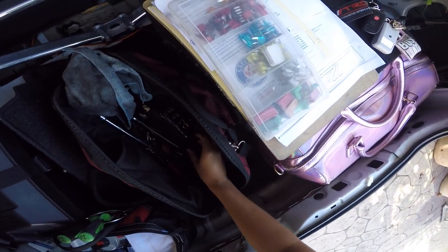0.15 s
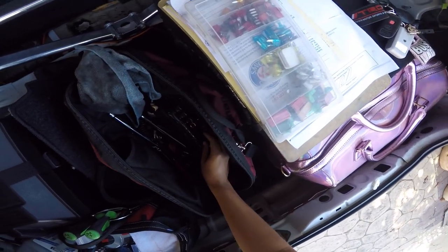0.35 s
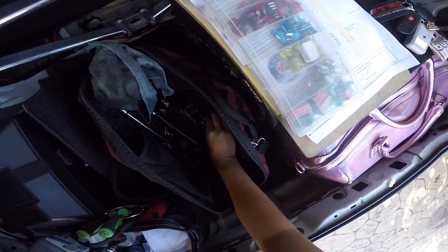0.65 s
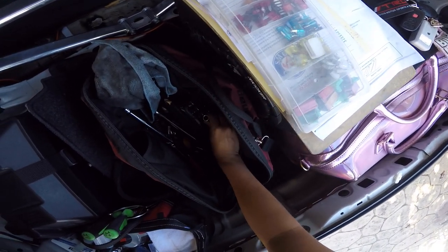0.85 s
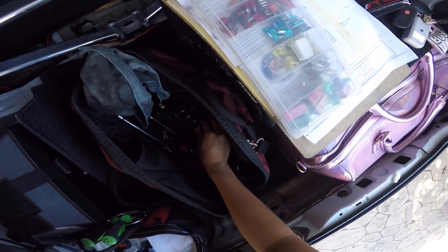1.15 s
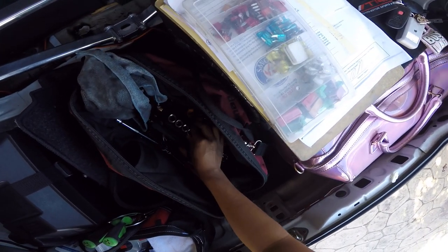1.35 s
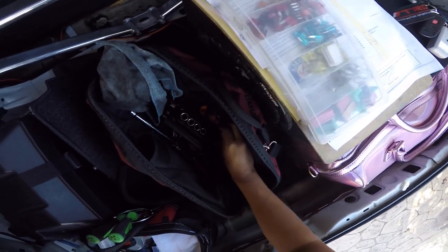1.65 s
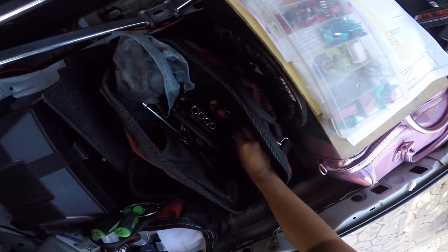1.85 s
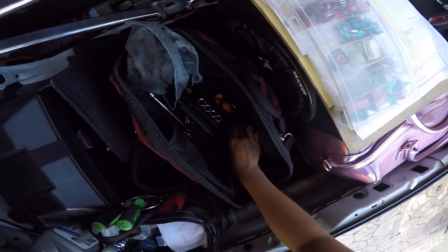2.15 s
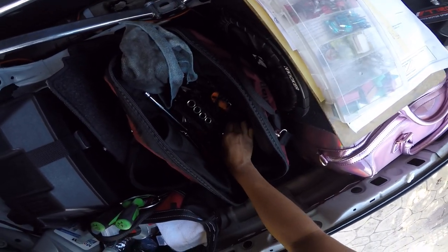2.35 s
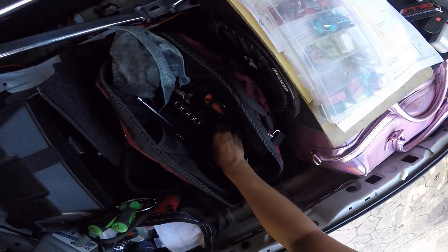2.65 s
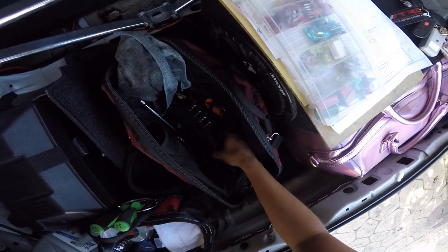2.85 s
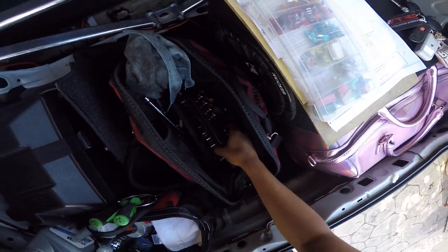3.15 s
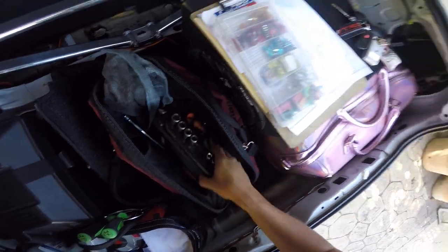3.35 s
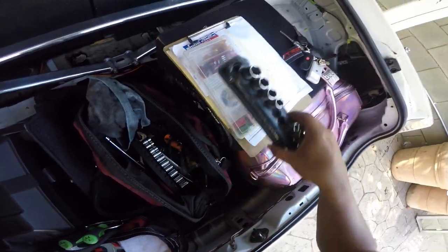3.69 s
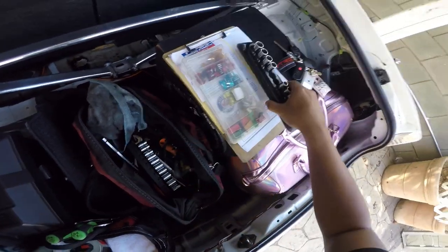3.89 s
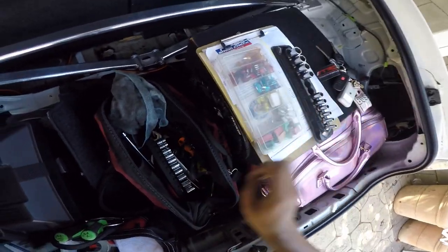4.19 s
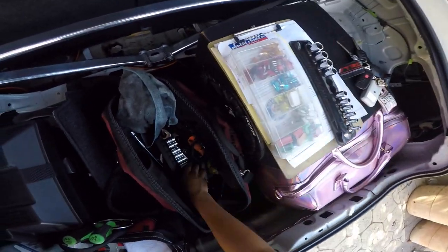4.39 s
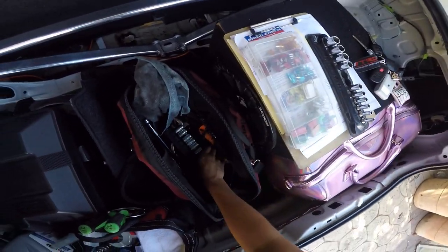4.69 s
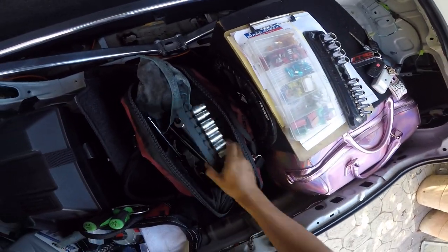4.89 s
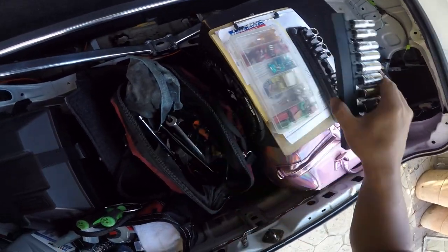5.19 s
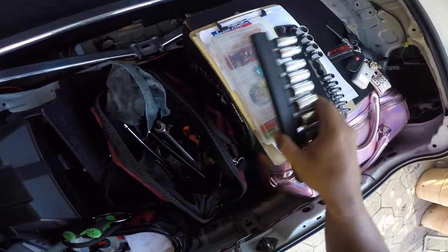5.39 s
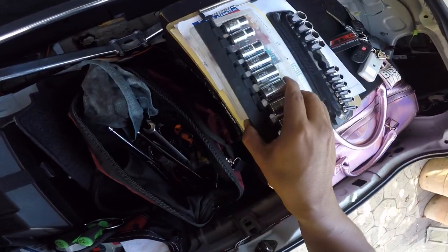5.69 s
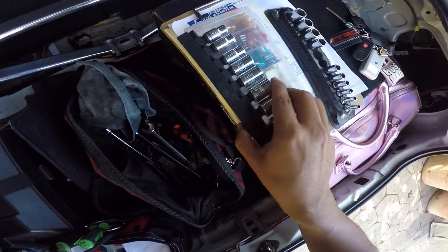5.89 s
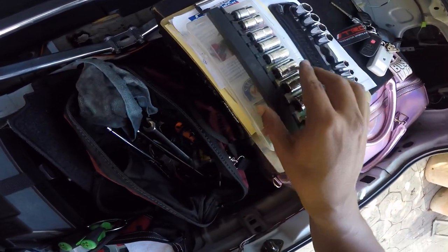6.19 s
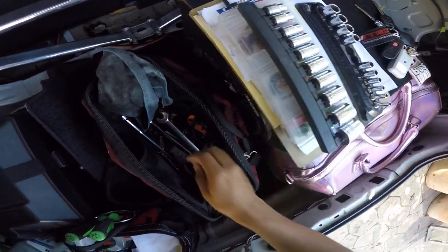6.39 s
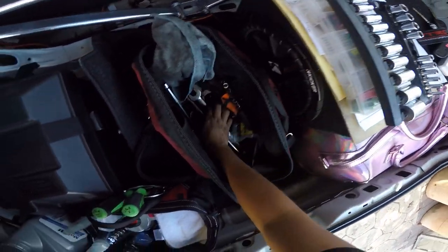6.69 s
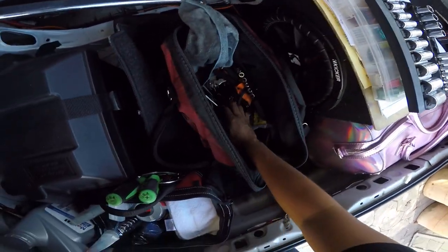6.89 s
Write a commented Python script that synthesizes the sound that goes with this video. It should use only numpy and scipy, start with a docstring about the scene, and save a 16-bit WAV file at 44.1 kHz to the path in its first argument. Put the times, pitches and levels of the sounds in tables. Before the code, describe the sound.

Plastic rails of metal sockets clack, knock and clink as a hand rummages in a cloth tool bag, over low motor rumble.

```python
"""Plastic rails of sockets clack, scrape and knock as a hand rummages in a fabric tool bag in an open car boot.
Damped bodies (rails, bag, box lid) are filtered rough contacts; sockets and wrenches are decaying sine modes.
The boot floor booms in a few low sines; cloth, motor, road and passing vehicle are shaped stereo noise.
Two microphone ports hear it, the right honking in the low mids; loud blows duck the gain."""
import sys
import numpy as np
from scipy import signal
from scipy.fft import rfft, irfft, next_fast_len
from scipy.io import wavfile
from scipy.ndimage import uniform_filter1d, minimum_filter1d

SR = 44100
rng = np.random.default_rng(int(sys.argv[2]) if len(sys.argv) > 2 else 0)


def transcribe(signal):
    """Save signal, clipped to [-1, 1], as a 16-bit WAV file at the path in sys.argv[1]."""
    frames = np.atleast_2d(signal).T
    limited = np.clip(frames, -1, 1)
    pcm = np.round(limited * 32767).astype(np.int16)
    wavfile.write(sys.argv[1], SR, pcm)


N = 310464
SECONDS = np.arange(N) / SR
HIT_S = np.arange(SR // 2) / SR   # time axis of one hit
FFT_SIZE = next_fast_len(N + SR)
BIN_HZ = np.maximum(np.fft.rfftfreq(FFT_SIZE, 1 / SR), 1)

# plastic rails snapping against tool handles: (time [s], level [dB], centre [Hz])
RAIL_CLACKS = [(0.5719, -18, 2100), (0.776, -19, 1980), (1.1318, -21, 1700), (1.1415, -16, 2030),
               (1.166, -18, 3300), (1.188, -22.5, 2000), (1.4655, -26.5, 3400), (1.521, -30, 2400),
               (2.1233, -18.5, 1670), (2.142, -15.5, 1811), (2.184, -24.5, 1950), (2.3468, -22.5, 4900),
               (2.3695, -15.5, 1900), (2.411, -15, 5100), (2.447, -20, 4982), (2.484, -11.5, 2600),
               (2.911, -22.5, 5000), (2.994, -18, 2007), (3.921, -9, 1960), (4.018, -17.5, 6820),
               (4.355, -25, 4500), (5.7855, -13, 2500), (5.9804, -9, 2888)]
# rails struck where they are hollow, ringing a moment: (time [s], level [dB], centre [Hz])
HOLLOW_RAIL_CLACKS = [(2.976, -16.5, 1850), (3.0522, -4, 2990), (3.968, -11, 1608), (6.731, -17, 1616)]
# rail dragged over the bag or box lid: (start [s], end [s], level of each slip [dB], centre [Hz])
RAIL_SCRAPES = [(0.778, 0.82, -32, 2680), (1.293, 1.33, -30, 2000), (2.513, 2.547, -35, 4200),
                (3.968, 4.015, -29, 1703), (6.066, 6.124, -24, 2670), (6.135, 6.16, -26.5, 3100)]
# rails bumping inside the bag: (time [s], level [dB], centre [Hz])
BAG_KNOCKS = [(0.158, -22.5, 643), (0.614, -10.5, 292.3), (0.775, -18, 466), (1.112, -11, 585),
              (1.167, -5.5, 588.5), (1.188, -13, 214.3), (1.279, -11.5, 328), (1.328, -10.5, 585),
              (1.364, -8, 484), (1.596, -13, 321), (2.295, -10, 315), (2.367, -15, 570), (2.487, -12, 533),
              (2.527, -12, 480), (2.768, -15, 580), (2.933, -7.5, 506.2), (2.976, -3.5, 409),
              (3.053, -6, 278.4), (3.176, -13.5, 566), (6.677, -4.5, 543.7), (6.753, -4, 536),
              (6.797, -11.5, 663), (6.83, -7.5, 186.7)]
# rails set down on the box lid, short and firm: (time [s], level [dB], centre [Hz])
BOX_LID_KNOCKS = [(4.023, 0.5, 486), (5.458, -5, 379), (5.786, 2, 432), (6.081, -6.5, 669.4),
                  (6.097, 2, 554.8), (6.135, -3.5, 777)]
# sockets struck on their rail: (time [s], level [dB], socket, t60 [s], relative clatter of neighbours [dB])
SOCKET_CLINKS = [(1.332, -11, "deep", 0.057, 0.5), (1.3608, -11.5, "medium", 0.076, 1),
                 (1.3701, -18.5, "large", 0.076, -2), (1.413, -23, "medium", 0.032, 2.5),
                 (2.932, -10, "deep", 0.0395, 8), (3.052, -7.5, "deep", 0.1225, 8),
                 (4.5696, -12, "medium", 0.0497, -6.5), (4.692, -15.5, "small", .05, -4.5),
                 (4.7424, -13, "large", 0.0813, 1.5), (6.6666, -18, "deep", 0.055, 6),
                 (6.668, -16, "large", 0.043, -3.5), (6.738, -19.5, "deep", 0.0307, 7),
                 (6.955, -10, "medium", 0.107, -10.5)]
# jostled sockets bouncing on other tools: (start [s], end [s], level of each bounce [dB])
SOCKET_CHATTERS = [(1.363, 1.384, -21.5), (3.024, 3.078, -15), (6.752, 6.858, -28), (6.975, 7.025, -30.5)]
# modes of each socket size: (frequency [Hz], relative level [dB])
SOCKET_MODES = {"small": [(4465, 3), (5405, -16)], "medium": [(3130, 1.5), (4097, -2), (4560, -1),
                (5550, -11), (6025, 1), (6510, -9.5), (10150, -17)], "large": [(1890, -5.5), (3125, -1.5),
                (3378, -14), (4430, -6.5), (5365, -9.5), (6015, -3), (12389, -22)], "deep": [(1930, -8),
                (4650, -6), (5540, 3.5), (7175, 0), (7560, -10), (14150, -11)]}
# loose wrenches struck: (time [s], level [dB], wrench, t60 [s])
WRENCH_CLANGS = [(2.936, -25, "short", 0.27), (3.021, -6, "flat", 0.086), (3.052, -14.5, "short", 0.188),
                 (4.387, -25, "flat", 0.063), (4.645, -38, "flat", 0.22), (6.668, -18, "short", 0.101),
                 (6.75, -11.5, "short", 0.346), (6.765, -13, "long", 0.445), (6.785, -18, "flat", 0.59),
                 (6.795, -15, "long", 0.216), (6.83, -13, "long", 0.207), (6.832, -17, "flat", 0.496),
                 (6.972, -7.5, "flat", 0.321)]
# modes of each wrench: (frequency [Hz], relative level [dB])
WRENCH_MODES = {"long": [(1491, -10), (3090, -8), (3803, 4), (4447, -8.5), (5377, -13), (9310, -1.5),
                (11610, -5.5)], "short": [(3187, -6.5), (5210, -2.5), (7127, -2.5), (7715, -0.5),
                (10640, -6.5), (12380, -7), (13940, -4.5), (15240, -9.5)], "flat": [(2560, -21), (4099, -9),
                (4655, -11), (5377, 3), (6514, -8.5), (7127, 2), (7474, -8.5), (9312, -5.5), (11628, -12.5),
                (14062, -10.5)]}
# spells of rummaging: (start [s], end [s], cloth hiss [dB], loose rattle [dB])
RUMMAGE_SPELLS = [(0, 0.593, -53.5, -45), (0.74, 0.849, -47.5, -27.5), (1.052, 1.73, -55, -36.5),
                  (1.912, 2.575, -53, -35), (2.669, 3.104, -54, -36), (3.565, 4.033, -51.5, -40.5),
                  (4.34, 4.431, -46, -27), (4.549, 4.853, -47, -31), (5.459, 5.711, -54, -33.5),
                  (5.925, 6.145, -53, -32), (6.524, 6.698, -52, -36.5), (6.689, 7.034, -43.5, -34.5)]
# weight landing on the boot floor: (time [s], level [dB])
FLOOR_THUMPS = [(1.168, -12), (1.361, -7), (2.942, -9.5), (3.053, -4), (4.029, -9), (4.743, -4),
                (6.096, -1.5), (6.674, -7.5), (6.865, -7.5)]
# floor panel modes: (frequency [Hz], relative level [dB])
FLOOR_MODES = [(88, -0.5), (112, 13.3), (135, 5.56)]
# motor rumble: (time [s], level [dB])
MOTOR_LEVEL = [(0.0, -24.5), (2.96, -19.5), (3.12, -23.5), (3.67, -23), (3.86, -17.5), (5.59, -18),
               (6.23, -17.5), (7.04, -18.5)]
# road noise: (time [s], level [dB])
ROAD_LEVEL = [(0.0, -36.5), (2.16, -30.5), (3.31, -31), (4.57, -22), (5.06, -26), (5.69, -23), (5.94, -20),
              (6.2, -24), (6.47, -27.5), (6.65, -27), (7.04, -32)]
# spectra of damped bodies and noises: (frequency [Hz], relative level [dB])
PLASTIC_SPECTRUM = [(300, 14.5), (1100, 11), (1900, 8), (2500, 0.5), (3400, 5.5), (5000, 0.5), (7300, -4),
                    (8700, -21.5), (13000, -22.5), (15500, -33.5)]
BAG_SPECTRUM = [(80, 1), (230, 4.5), (370, 4.5), (470, -5), (600, 2), (780, -2), (1050, -12.5),
                (1800, -20.5), (4000, -32.5), (12000, -99)]
FABRIC_SPECTRUM = [(500, -20.5), (1800, 11.5), (3500, 7), (7300, 3), (8800, -1.5), (10500, -3.5),
                   (13000, -13), (15500, -27.5)]
RUMBLE_SPECTRUM = [(15, -5.5), (26, 6), (33, -2.5), (45, 9), (62, 1), (72, 6), (85, -0.5), (98, -1),
                   (109, 10.5), (122, -2), (155, -12.5), (300, -27.5), (900, -75.5), (5000, -110)]
ROAD_SPECTRUM = [(60, -13), (150, 8), (205, 4), (290, 2), (400, 1), (650, 0), (820, -6), (1050, -14),
                 (1750, -22), (2500, -38), (5000, -49), (15000, -69)]
EXHAUST_SPECTRUM = [(35, -21), (62, 12), (100, -9), (140, -1), (165, 6.5), (210, 10.5), (270, -8),
                    (500, -12), (5000, -110)]
# microphone ports: (frequency [Hz], left minus right [dB])
PORT_DIFFERENCE = [(290, -0.5), (470, -2.5), (760, -12.5), (1200, -3), (1950, 3), (3000, -0.5)]
# likeness of the two channels for diffuse sound: (frequency [Hz], correlation)
PORT_LIKENESS = [(150, 1), (400, 1), (620, 1), (800, 0), (1200, 0), (2800, 0.515), (6500, 0.051),
                 (15000, 0)]

# light touches: the rail's resonance varies with the spot
TOUCH_HZ, TOUCH_SCATTER_OCT = 2160, 0.3
# a harder bump is higher in pitch and clacks more: clack relative to the knock at HARD_HZ, and its slope
HARD_HZ, KNOCK_CLACK_DB, HARDNESS_DB_PER_OCT = 579.5, -15, 12.5
RATTLES_PER_S, SLIPS_PER_S, CONTACT_SPREAD_DB = 42, 330, 3.0
SLIP_KNOCK_DB = 7.5   # the surface below relative to each slip
CHATTERS_PER_S, CHATTER_T60_S = 140, 0.059
RING_LINEWIDTH_HZ = 5   # wander of a mode while its tool touches others
HAND_RAMP_S, CLOTH_REST_DB, CLOTH_GRAIN_DB = 0.019, -58, 2.3
CEILING_DB, RECOVERY_DB_PER_S, GAIN_WINDOW_S = -0.5, 8, 0.0046
CUTOFF_HZ = 15600


def rails():
    """Plastic clacks, alone, with each bump and as loose rattle; contents shift in grains around firm ones."""
    bumps = []
    for s, db, hz in [*BAG_KNOCKS, *BOX_LID_KNOCKS]:
        hardness_db = HARDNESS_DB_PER_OCT * np.log2(hz / HARD_HZ)
        bumps.append((s, db + KNOCK_CLACK_DB + hardness_db))
    touches = [(s, db, TOUCH_HZ * 2 ** (TOUCH_SCATTER_OCT * rng.normal()))
               for s, db in [*bumps, *rattles()]]
    clacks = dull_hits([*RAIL_CLACKS, *touches], PLASTIC_SPECTRUM, q=5.0, blow_db=9, broad_db=-3,
                       crack_t60_s=.015, tail_db=-17, tail_t60_s=.07, spread=.3)
    clacks += dull_hits(HOLLOW_RAIL_CLACKS, PLASTIC_SPECTRUM, q=5.0, blow_db=4, broad_db=-13,
                        crack_t60_s=.045, tail_db=-20, tail_t60_s=.09, spread=.3)
    firm = [*RAIL_CLACKS, *HOLLOW_RAIL_CLACKS, *bumps]
    return from_db(1.5) * clacks + shifting_contents(firm)


def shifting_contents(firm):
    """Random grains of plastic noise, swelling and fading around each firm contact."""
    # 8.8 ms each side of a contact
    activity = np.sqrt(sum(from_db(db) * np.exp(-np.abs(SECONDS - s) / 0.0088) for s, db, *_ in firm))
    strength = from_db(2.0 * np.minimum(rng.exponential(1, N), 3))
    grains = (rng.random(N) < 260 / SR) * strength   # 260 per second
    envelope = signal.lfilter([1], [1, -np.exp(-1 / (0.00707 * SR))], grains)   # each dies in 7 ms
    envelope *= from_db(-30) / envelope.std()
    return activity * envelope * diffuse(PLASTIC_SPECTRUM) / 2


def rattles():
    """Small contacts while the hand moves: (time [s], level [dB])."""
    spells = [(start, end, db) for start, end, _, db in RUMMAGE_SPELLS]
    return uneven(spells, RATTLES_PER_S, count=40)


def scrapes():
    """A dragged rail sticks and slips; each slip ticks in the plastic and knocks on the surface below."""
    slips = uneven(RAIL_SCRAPES, SLIPS_PER_S)
    below = [(s, db + SLIP_KNOCK_DB, HARD_HZ * 2 ** (rng.normal() / 2)) for s, db, _ in slips]
    touch = dict(q=5, blow_db=4, broad_db=-9, crack_t60_s=.018, tail_db=-15, tail_t60_s=.06, spread=.15)
    return dull_hits(slips, PLASTIC_SPECTRUM, **touch) + dull_hits(below, BAG_SPECTRUM, **touch)


def knocks():
    """The bag answers a rail with a loose thud, the box lid with a compact one."""
    bag = dull_hits(BAG_KNOCKS, BAG_SPECTRUM, q=4.8, blow_db=18.5, broad_db=-13.0,
                    crack_t60_s=0.0567, tail_db=-4.5, tail_t60_s=0.13, spread=0.034)
    lid = dull_hits(BOX_LID_KNOCKS, BAG_SPECTRUM, q=4.0, blow_db=19, broad_db=-11.0,
                    crack_t60_s=0.025, tail_db=-17, tail_t60_s=0.1, spread=0.034)
    return from_db(-0.04) * bag + lid


def sockets():
    """The rail's grip damps the sockets quickly; jostled, one after another chatters on the other tools."""
    out = np.zeros((2, N))
    bounces = [(s, db, rng.choice(list(SOCKET_MODES)), CHATTER_T60_S, 0)
               for s, db in uneven(SOCKET_CHATTERS, CHATTERS_PER_S)]
    for s, db, size, t60_s, clatter_db in [*SOCKET_CLINKS, *bounces]:
        clink = steel(SOCKET_MODES[size], t60_s, detune=0.0155, spread=0.387, others_db=clatter_db - 5.5,
                      others_t60_s=t60_s * 1.28, crack_db=clatter_db + 6.5)
        add(out, s, db + 0.5, clink)
    return out


def wrenches():
    """Loose wrenches ring on unless the bag or the hand damps them."""
    out = np.zeros((2, N))
    for s, db, kind, t60_s in WRENCH_CLANGS:
        clang = steel(WRENCH_MODES[kind], t60_s, detune=0.0045, spread=0.675, others_db=-6,
                      others_t60_s=t60_s * 0.44, crack_db=-6.0)
        add(out, s, db - 0.5, clang)
    return out


def boot_floor():
    """The floor panel booms briefly in its low modes under a weight."""
    out = np.zeros((2, N))
    envelope = fade(0.15) * (1 - fade(0.0321))
    for s, db in FLOOR_THUMPS:
        boom = sum(from_db(mode_db + 2 * rng.normal()) * np.sin(2 * np.pi * hz * HIT_S)
                   for hz, mode_db in FLOOR_MODES) * envelope
        add(out, s, db + 2.0, np.array([boom, boom]))
    return out


def fabric():
    """The cloth hisses and catches unevenly under the hand, and settles quietly between spells."""
    brush = from_db(CLOTH_REST_DB)
    for start, end, hiss_db, _ in RUMMAGE_SPELLS:
        moving = np.clip(.5 + np.minimum(SECONDS - start, end - SECONDS) / HAND_RAMP_S, 0, 1)
        brush = np.maximum(brush, from_db(hiss_db - 2.0) * moving)
    catching_db = 0.6 * drift(51) + CLOTH_GRAIN_DB * drift(260)
    return brush * from_db(catching_db) * diffuse(FABRIC_SPECTRUM)


def street():
    """Low motor rumble, and road noise that swells as a vehicle goes by."""
    rumble = from_db(in_time(MOTOR_LEVEL) + 2.5) * diffuse(RUMBLE_SPECTRUM)
    road = from_db(in_time(ROAD_LEVEL) + 2.5 + 1.85 * drift(25)) * diffuse(ROAD_SPECTRUM)
    return rumble + road + vehicle(nearest_s=5.293, passing_s=1.0, db=-20.0)


def vehicle(nearest_s, passing_s, db):
    """The exhaust drones loudest as the vehicle passes the opening."""
    away = (SECONDS - nearest_s) / passing_s
    return from_db(db + 3.9 * drift(24)) / (1 + away ** 2) * diffuse(EXHAUST_SPECTRUM)


def uneven(spells, per_s, count=24):
    """Contacts at uneven gaps and strengths in each spell: (time [s], level [dB], other columns)."""
    rows = []
    for start, end, db, *rest in spells:
        times = start + np.cumsum(rng.gamma(2, .5, count)) / per_s
        levels = db + CONTACT_SPREAD_DB * rng.standard_normal(count)
        rows += [(s, level, *rest) for s, level in zip(times, levels) if s < min(end, N / SR)]
    return rows


def contact(crack_t60_s, tail_db, tail_t60_s, spread):
    """A rough contact: a short crack, and scatter from the boot's walls that differs at each port."""
    t = HIT_S[:int(max(tail_t60_s, crack_t60_s) * SR)]
    mid, side = rng.standard_normal((2, len(t)))
    envelope = fade(crack_t60_s, t) + from_db(tail_db) * fade(tail_t60_s, t)
    return (mid + spread * side * [[1], [-1]]) * envelope


def dull_hits(rows, spectrum, q, blow_db, broad_db, crack_t60_s, tail_db, tail_t60_s, spread):
    """Contacts on a heavily damped body; the spot hit adds one resonance to its broad response."""
    out = np.zeros((2, N))
    body = irfft(response(spectrum), FFT_SIZE)[:2048]
    for s, db, hz in rows:
        force = contact(crack_t60_s, tail_db, tail_t60_s, spread)
        force[:, 0] += from_db(blow_db)   # one clean blow leads
        hit = signal.fftconvolve(force, [body], axes=1)
        spot = signal.lfilter(*signal.iirpeak(hz, q, fs=SR), hit)
        add(out, s, db, spot + from_db(broad_db) * hit)
    return out


def steel(modes, t60_s, detune, spread, others_db, others_t60_s, crack_db):
    """A struck tool rings in its own modes and sets its neighbours ringing briefly."""
    t = HIT_S[:int(max(1.5 * t60_s, .15) * SR)]

    def partial(hz, decay_s, waver=0):
        """One decaying mode, its phase differing between the ports."""
        phase = rng.uniform(0, 2 * np.pi) + spread * rng.normal(size=(2, 1))
        return np.sin(2 * np.pi * hz * t + phase + waver) * fade(decay_s, t)

    ring = 0
    for hz, mode_db in modes:
        # touching other tools makes each mode waver
        waver = np.cumsum(rng.standard_normal(len(t))) * np.sqrt(2 * np.pi * RING_LINEWIDTH_HZ / SR)
        # the highest modes die soonest
        main = partial(hz, t60_s * min(1, 7500 / hz), waver)
        # a close twin beats with it
        twin = partial(hz * (1 + detune * rng.normal()), t60_s * .7, -waver)
        ring = ring + from_db(mode_db + 1.5 * rng.normal()) * (main + twin / 3)
    others = sum(rng.rayleigh() * partial(hz, others_t60_s) for hz in rng.uniform(2900, 8100, 24))

    crack = contact(crack_t60_s=.024, tail_db=-16, tail_t60_s=min(1.5 * t60_s, .13), spread=.7)
    crack = np.pad(crack, [(0, 0), (0, len(t) - crack.shape[1])])
    crack = signal.sosfilt(signal.butter(3, [1500, 7600], "band", fs=SR, output="sos"), crack)

    # balance by the level of the first 200 samples
    ring = ring / ring[:, :200].std() + from_db(others_db) * others / others[:, :200].std()
    # the tool settles over a few ms rather than in one blow
    return (ring + from_db(crack_db) * crack) * (1 - fade(0.0074, t))


def add(track, s, peak_db, sound):
    """Lay a stereo sound into the track at this time, its left-right mean at this peak level."""
    start = int(s * SR)
    scaled = from_db(peak_db) * sound / np.abs(sound.mean(0)).max()
    track[:, start:start + sound.shape[1]] += scaled[:, :N - start]


def diffuse(spectrum):
    """Stereo noise from all around, likeness falling with frequency; rms 1 in the middle."""
    alike = np.clip(over_hz(PORT_LIKENESS), -.9, 1)
    mid, side = rng.standard_normal((2, N))
    gain = from_db(over_hz(spectrum))
    mid = filtered(mid, gain)
    side = filtered(side, gain * np.sqrt((1 - alike) / (1 + alike)))
    return (mid + side * [[1], [-1]]) / mid.std()


def drift(rate_hz):
    """Slow chance: random points joined by lines, with a spread just under 1."""
    return np.interp(SECONDS * rate_hz, np.arange(2000), rng.standard_normal(2000))


def fade(t60_s, t=HIT_S):
    """Exponential decay, 60 dB in t60_s."""
    return from_db(-60 * t / t60_s)


def from_db(db):
    """Decibels to gain."""
    return 10 ** (np.asarray(db) / 20)


def in_time(rows):
    """A level curve at every sample."""
    s, level = np.transpose(rows)
    return np.interp(SECONDS, s, level)


def over_hz(points):
    """A table read along log frequency."""
    hz, value = np.transpose(points)
    return np.interp(np.log(BIN_HZ), np.log(hz), value)


def response(spectrum):
    """The causal, minimum-phase filter with this spectrum, by folding its cepstrum."""
    cepstrum = irfft(np.log(from_db(over_hz(spectrum))), FFT_SIZE)[:FFT_SIZE // 2]
    cepstrum[1:] *= 2
    return np.exp(rfft(cepstrum, FFT_SIZE))


def filtered(x, gain):
    """Pass x through a frequency response."""
    return irfft(rfft(x, FFT_SIZE) * gain, FFT_SIZE)[..., :N]


def gain_control(x):
    """A blow over the ceiling pushes the whole sound down, and it creeps back up."""
    window = max(int(GAIN_WINDOW_S * SR), 1)
    over_db = np.maximum(20 * np.log10(np.abs(x).max(0) + 1e-9) - CEILING_DB, 0)
    recovery_db = RECOVERY_DB_PER_S * SECONDS
    cut_db = np.maximum.accumulate(over_db + recovery_db) - recovery_db
    # centred windows start the cut just ahead of the blow
    held_db = minimum_filter1d(-cut_db, window)
    return x * from_db(uniform_filter1d(held_db, window))


def scene():
    """Everything in the boot, with the street behind it."""
    tools = rails() + scrapes() + knocks() + sockets() + wrenches()
    return tools + boot_floor() + fabric() + street()


def record(dry):
    """The two ports colour the sound differently; loud blows duck the gain and the top is cut."""
    ratio = response([(140, 0), *PORT_DIFFERENCE])   # left over right
    ports = np.array([ratio, np.ones_like(ratio)]) * 2 / (1 + ratio)   # the mean of the two stays flat
    heard = gain_control(filtered(dry, ports))
    return signal.sosfilt(signal.ellip(10, .1, 90, CUTOFF_HZ, fs=SR, output="sos"), heard)


dry = scene()
out = record(dry)
transcribe(out)
```